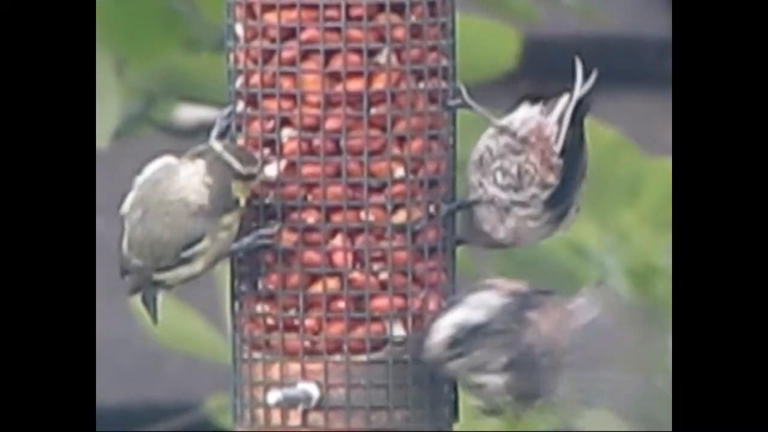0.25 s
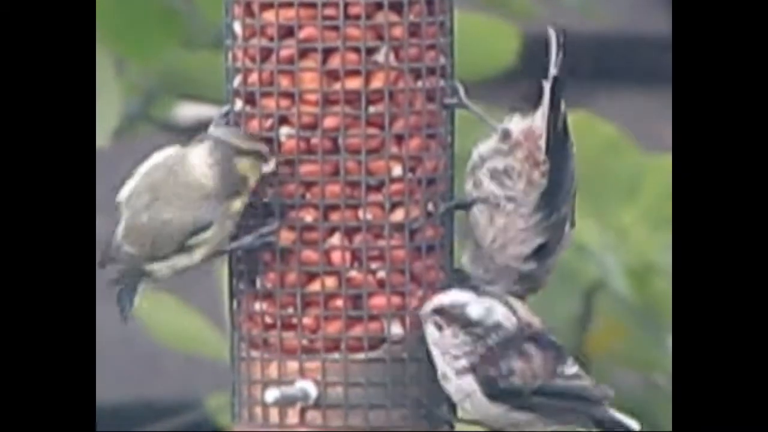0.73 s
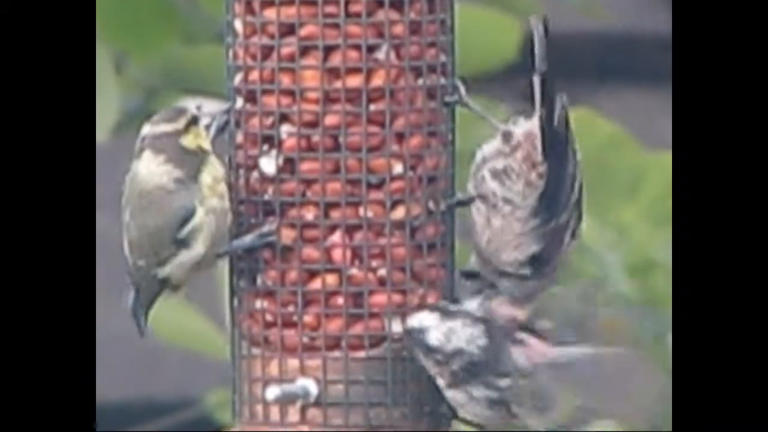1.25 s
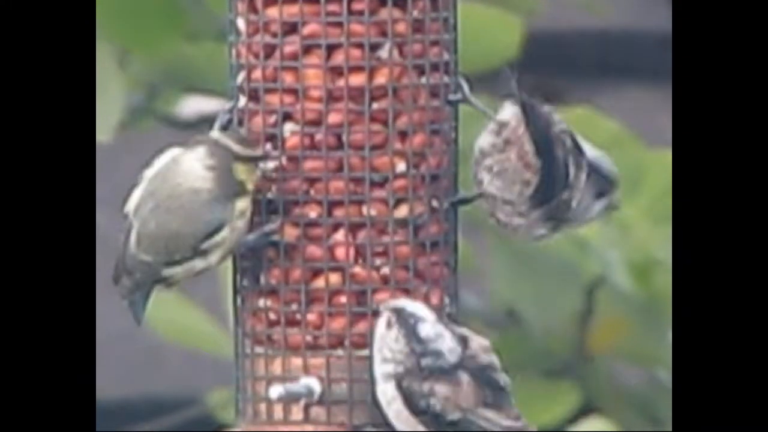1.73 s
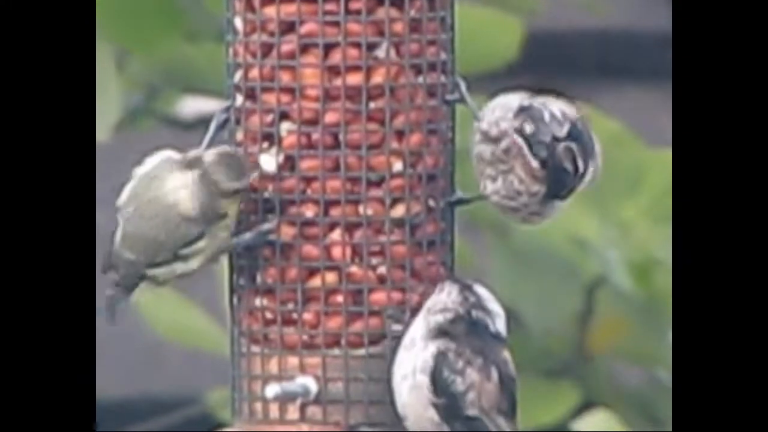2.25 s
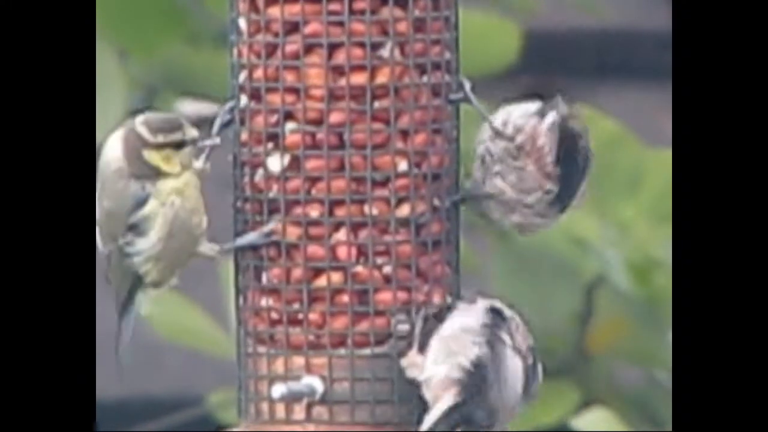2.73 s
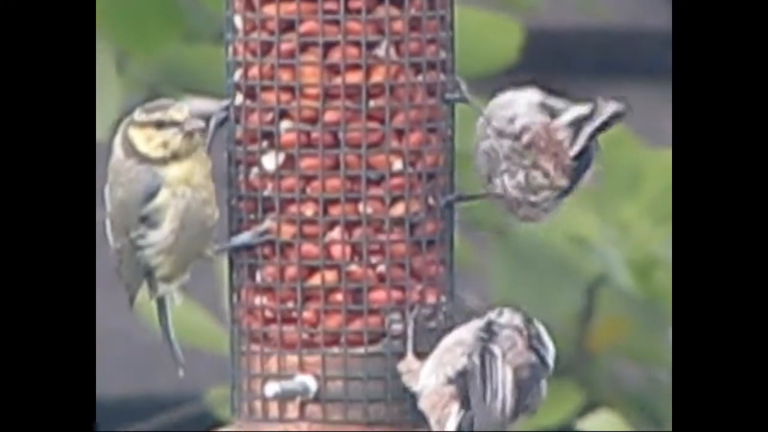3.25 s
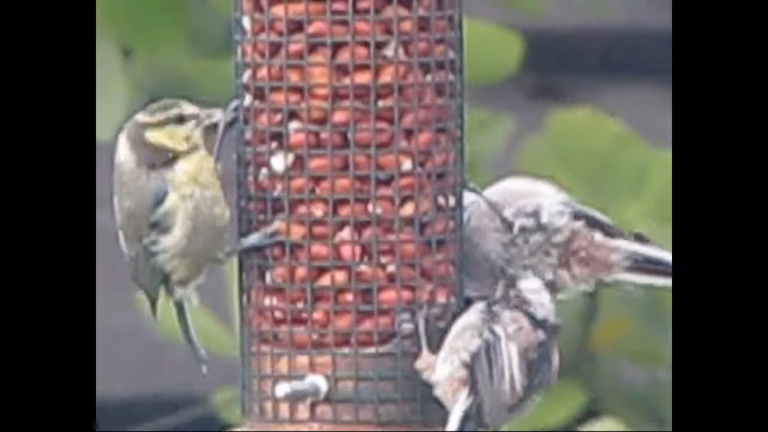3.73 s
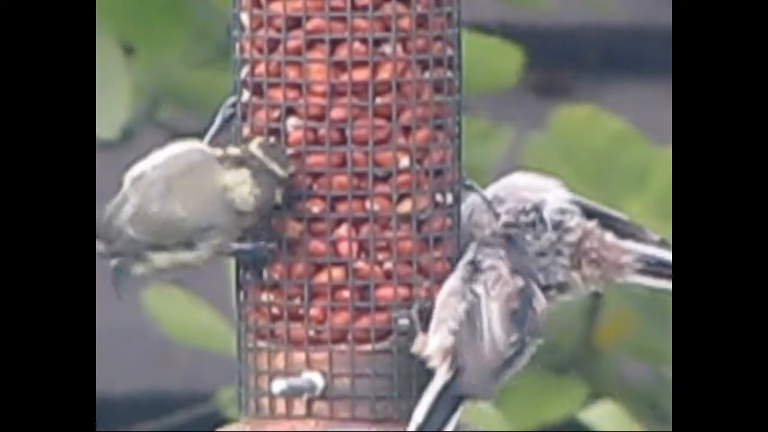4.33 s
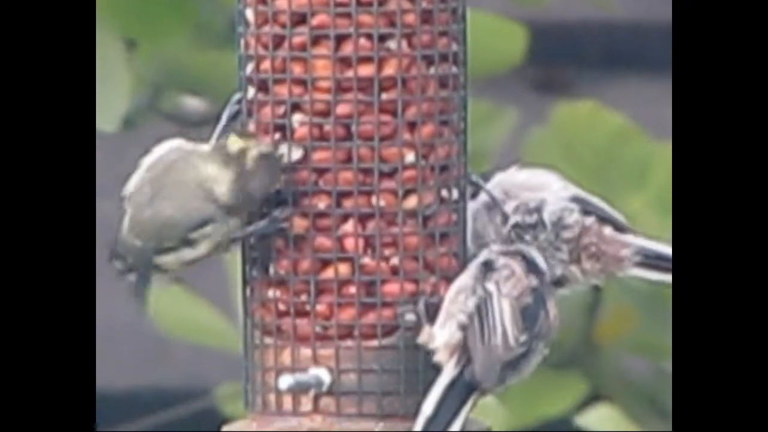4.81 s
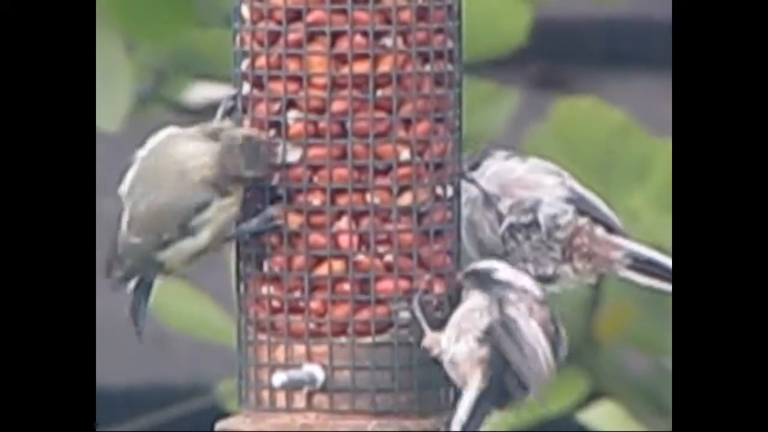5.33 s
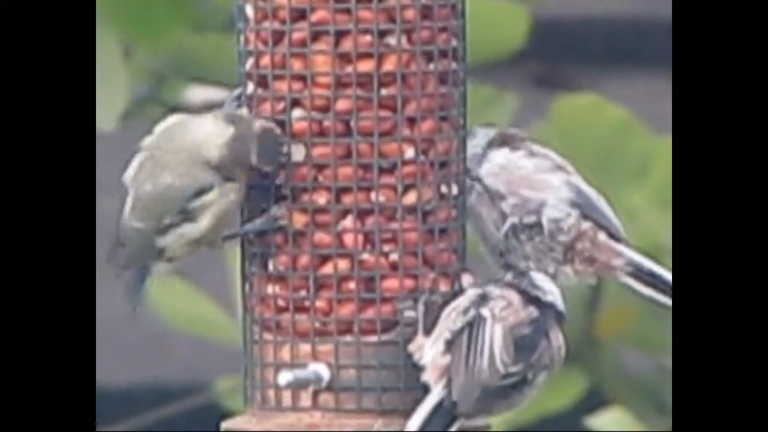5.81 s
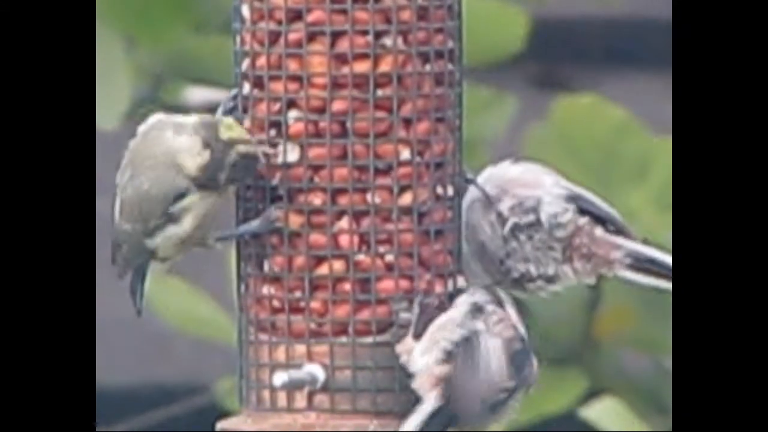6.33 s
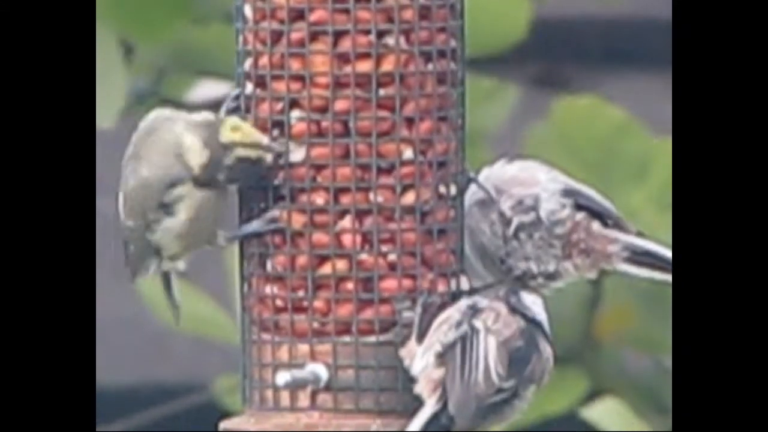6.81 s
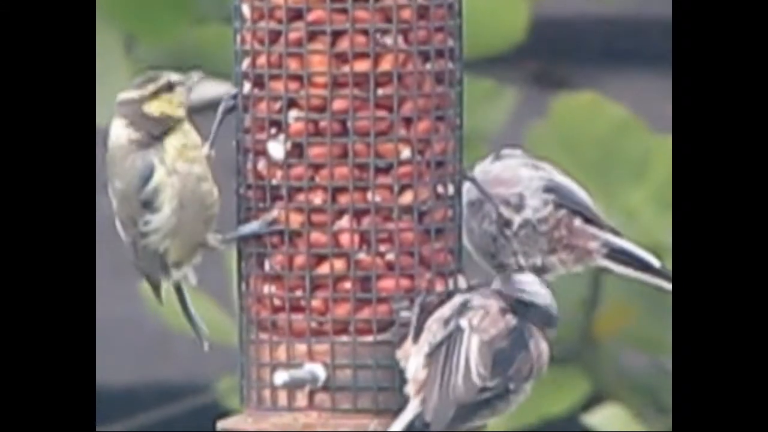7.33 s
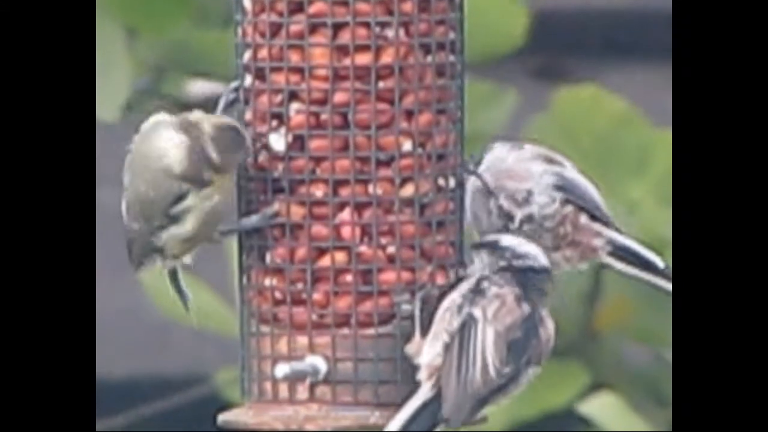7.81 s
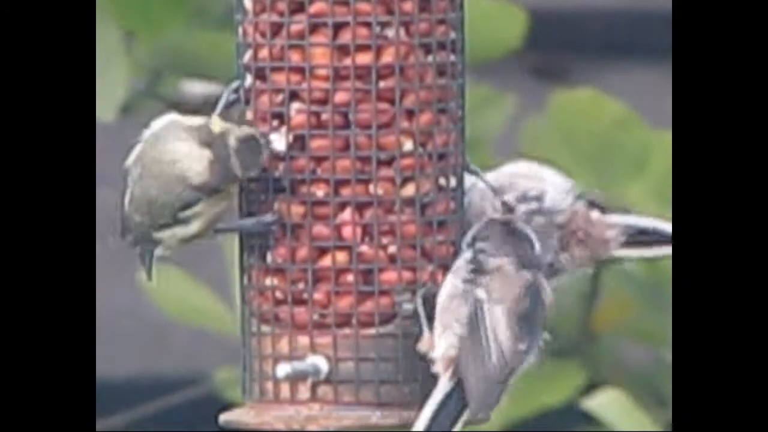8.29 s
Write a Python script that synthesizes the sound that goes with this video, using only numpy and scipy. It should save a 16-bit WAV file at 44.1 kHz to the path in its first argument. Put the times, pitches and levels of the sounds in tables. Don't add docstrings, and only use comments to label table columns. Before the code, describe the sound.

At a garden feeder, tiny birds chip, churr and warble in quick high notes while wings flutter above a faint hum and distant traffic.

```python
import sys
import numpy as np
from scipy import signal
from scipy.fft import rfft, irfft
from scipy.io import wavfile
from scipy.ndimage import uniform_filter1d, map_coordinates

SR = 44100
rng = np.random.default_rng(int(sys.argv[2]) if len(sys.argv) > 2 else 0)


def linear_from_db(decibels):
    return 10 ** (np.asarray(decibels, float) / 20)


def dump(signal):
    limited = np.clip(np.atleast_2d(signal).T, -1, 1)
    pcm = np.round(limited * 32767).astype(np.int16)
    wavfile.write(sys.argv[1], SR, pcm)


N = 377496


def unit(x):
    return x / np.sqrt(np.mean(x ** 2) + 1e-20)


def along(points, hz):
    f, v = np.transpose(points)
    return np.interp(np.log(hz + 1), np.log(f + 1), v)


def wobble(rate_hz, size=N):
    knots = rng.standard_normal(int(size * 2000 / SR) + 4)
    return map_coordinates(knots, [np.arange(size) * rate_hz / SR])


def add(out, start_s, x):
    part = out[max(round(start_s * SR), 0):][:len(x)]
    part += x[:len(part)]


# frequency in Hz, correlation (0 to 1).
STEREO_LIKENESS = [(60, 1), (130, 0.98), (290, 0.96), (630, 0.92), (1370, 0.76), (3010, 0.47), (6580, 0.46),
                   (14400, 0.6)]
# frequency in Hz, left minus right in dB.
STEREO_LEAN = [(60, -0.5), (240, -1), (930, -1.0), (3660, -0.5), (14400, 1)]


def rush(spectrum):
    hz = np.fft.rfftfreq(N, 1 / SR)
    turn = np.arccos(np.clip(along(STEREO_LIKENESS, hz), -1, 1)) / 2
    shaped = rfft(rng.standard_normal((2, N))) * linear_from_db(along(spectrum, hz))
    mid, side = irfft(shaped * [np.cos(turn), np.sin(turn)], N)
    lean = linear_from_db(np.outer([.5, -.5], along(STEREO_LEAN, hz)))
    return unit(irfft(rfft([mid + side, mid - side]) * lean, N))


# frequency in Hz, level in dB.
HUM_TONES = [(120.3, -50), (165.6, -57), (222.5, -59)]


def machine_hum():
    t = np.arange(N) / SR
    hum = 0
    for (hz, db), unsteady in zip(HUM_TONES, (.9, 2.6, 2.2)):
        level = linear_from_db(db + 3.0 + unsteady * wobble(5.4))
        hum = hum + level * np.sin(2 * np.pi * hz * t + unsteady * 0.23 * wobble(5))
    return hum


# frequency in Hz, level in dB per Hz.
TRAFFIC_SPECTRUM = [(12, -47), (20, -12.5), (54, 3.5), (91, -5.5), (102, -23), (124, -1.5), (140, -7),
                    (174, 0), (193, -18), (217, -1), (276, -44), (351, -49), (420, -13), (550, -16),
                    (920, -120)]


def traffic():
    return linear_from_db(-53 + 0.86 * wobble(4.04)) * rush(TRAFFIC_SPECTRUM)


# frequency in Hz, level in dB per Hz.
VEHICLE_SPECTRUM = [(210, -35), (350, -10), (525, -13.5), (908, -6.5), (1170, -10.5), (1260, -8.5),
                    (2120, -17.5), (3500, -24.5), (4550, -75), (7700, -120)]


def vehicle():
    near_db, leaves_s = 9.5, 1.64
    t = np.arange(N) / SR
    return linear_from_db(-62 + near_db * np.exp(-t / leaves_s)) * rush(VEHICLE_SPECTRUM)


# frequency in Hz, level in dB per Hz.
HISS_SPECTRUM = [(180, -3), (300, -3), (482, -15.5), (690, -10), (826, -17), (941, -18.5), (1240, -15),
                 (1350, -19), (5490, -23.5), (6150, -24), (10400, -30.5), (13200, -35), (14800, -63)]


def hiss():
    return linear_from_db(-55 + 0.21 * wobble(2.15)) * rush(HISS_SPECTRUM)


def echo(x, t60s, delay_s, unlike):
    step, lap = SR // 4, SR // 50
    out = np.zeros((2, N + SR))
    ramp = np.sin(np.pi / 2 * np.arange(lap) / lap) ** 2
    fade = np.concatenate([ramp, np.ones(step - lap), 1 - ramp])
    padded = np.pad(x, (lap, step))
    for start in range(0, N + lap, step):
        hz, t, z = signal.stft(rng.standard_normal((2, SR // 3)), SR, nperseg=128)
        decay = linear_from_db(-60 * t / along(t60s, hz)[:, None])
        mid, side = signal.istft(z * decay, SR, nperseg=128)[1]
        tail = np.array([mid + unlike * side, mid - unlike * side]) / np.linalg.norm(mid)
        piece = padded[start:start + step + lap]
        wet = signal.fftconvolve((piece * fade[:len(piece)])[None], tail, axes=1)
        out[:, start + round(delay_s * SR):][:, :wet.shape[1]] += wet
    return out[:, lap:N + lap]


# frequency in Hz, t60 in seconds.
WALL_T60 = [(1500, 0.26), (4000, 0.27), (8000, 0.39), (12000, 0.59)]


def walls(x):
    return echo(x, WALL_T60, delay_s=0.014, unlike=0.028)


# frequency in Hz, t60 in seconds.
LEAF_T60 = [(1500, 0.023), (4000, 0.042), (8000, 0.078), (12000, 0.11)]


def leaves(x):
    return echo(x, LEAF_T60, delay_s=0.0025, unlike=0.013)


# delay in seconds, level in dB.
FENCE_SLAPS = [(.0043, -12.5), (.0092, -29)]


def fence(x):
    return sum(linear_from_db(db) * np.pad(x, (round(delay_s * SR), 0))[:N] for delay_s, db in FENCE_SLAPS)


# frequency in Hz, gain in dB.
THROAT_GAIN = [(1050, -16), (1500, 9.5), (2000, -13.5), (4000, -1.5), (7500, -6.5), (9000, -8.5),
               (14000, -14), (17000, -25)]


def voice(hz, db, partials, edge_s, flutter_db):
    t = np.arange(len(hz)) / SR
    swell = np.sin(np.pi / 2 * np.clip(np.minimum(t, t[-1] - t) / edge_s, 0, 1))
    phase = 2 * np.pi * (np.cumsum(hz) / SR + rng.random())
    tone = sum(linear_from_db(level + along(THROAT_GAIN, k * hz)) * np.sin(k * phase) for k, level in partials)
    return linear_from_db(db + flutter_db * wobble(309.0, size=len(hz))) * swell * tone


def bend(length_s, *hz):
    path = np.interp(np.linspace(0, 1, round(length_s * SR)), np.linspace(0, 1, len(hz)), hz)
    return uniform_filter1d(path, size=31, mode="nearest")


def whistled(hz, db, flutter_db, first_db=-40, edge_s=0.0021):
    third_db = -21 + 0.019 * np.clip(hz - 7300, -1500, 0)
    upper_db = -44 + .007 * np.clip(5800 - hz, 0, 2500)
    partials = [(1.003, 0), (.5, first_db), (5.3, upper_db), (1.502, third_db)]
    return voice(hz, db, partials, edge_s, flutter_db)


def low(hz, db, octave_db, push=3.6, bright=0.):
    gain_db = push * np.clip(3200 - hz, 0, 1800) / 1000 + bright * (hz - 4500) / 1000
    return voice(hz, db + gain_db, [(1, 0.18), (2, octave_db)], edge_s=0.0016, flutter_db=3.0)


def noise_cloud(db):
    t = np.linspace(-1, 1, SR // 40)
    band = signal.butter(4, [1700, 7000], "band", fs=SR, output="sos")
    air = signal.sosfilt(band, rng.standard_normal(len(t)))
    return linear_from_db(db) * unit(air) * np.exp(-(t / 0.49) ** 2)


# first beat in seconds, gap in seconds, beat count, first level in dB, last level in dB.
WING_BURSTS = [(0.149, .0334, 3, -59, -54), (0.349, .0235, 4, -56, -55), (0.5536, .035, 1, -61, -58),
               (4.235, .0355, 5, -50, -68), (4.41, .0348, 5, -66, -60), (4.584, .0367, 3, -57, -53.5),
               (4.698, .0344, 2, -58, -61), (4.8715, .035, 1, -63, -56), (5.012, .029, 3, -62, -57.5),
               (5.142, .0345, 3, -59, -57), (5.248, .04, 2, -59, -54), (5.6046, .0388, 2, -49.5, -49),
               (6.4634, .035, 1, -60, -54), (6.838, .035, 1, -67, -57), (7.059, .0298, 2, -49, -47),
               (7.339, .0356, 2, -49, -52), (7.5446, .035, 1, -55, -54), (8.2845, .035, 1, -60, -58)]


def wings():
    rustle_db, rustle_rise_s = -9, .0022
    out, t = np.zeros(N), np.arange(SR // 30) / SR
    bands = [signal.butter(2, [0.77 * hz, 1.3 * hz], "band", fs=SR, output="sos")
             for hz in (1980, 2780, 3600, 4800, 6400)]
    for first_s, gap_s, count, first_db, last_db in WING_BURSTS:
        for i, db in enumerate(np.linspace(first_db, last_db, round(count))):
            clap_hz = 1800 * (1 + rng.normal(0, 0.03))
            beat = np.sin(2 * np.pi * clap_hz * t) * np.exp(-((t - .003) / 0.0013) ** 2)
            for k, band in enumerate(bands):
                rustle = unit(signal.sosfilt(band, rng.standard_normal(len(t))))
                swell = np.exp(-((t - .0045 - rustle_rise_s * k) / 0.0032) ** 2)
                beat = beat + linear_from_db(rustle_db - 3.3 * k) * rustle * swell
            add(out, first_s + i * gap_s - .001, linear_from_db(db + 8.5) * beat)
    return out


# start in seconds, length in seconds, start pitch in Hz, end pitch in Hz, level in dB.
FAR_BIRDS = [
    (0.11, 0.027, 7450, 6050, -53),
    (3.725, .1, 6640, 6040, -70.5),
    (3.85, 0.059, 6000, 5300, -72),
    (4.63, 0.083, 7500, 7000, -67.5),
    (4.895, 0.14, 7700, 6700, -74),
    (7.45, 0.073, 6250, 6250, -69),
]
DISTANT_PIPER = [
    (5.71, 0.36, 5620, 5550, -75),
]
LEVEL_WHISTLES = [
    (0.817, 0.037, 8055, 7925, -39),
    (2.71, 0.032, 7750, 7850, -47.5),
]
THIN_WHISTLES = [
    (1.08, 0.075, 8260, 8280, -44),
    (1.24, 0.078, 8300, 8180, -45),
    (1.415, 0.08, 8320, 8040, -46),
    (1.57, 0.099, 8420, 7710, -46.5),
    (1.73, .118, 8420, 7770, -45),
    (1.912, .116, 8420, 7540, -43),
    (2.08, 0.11, 8260, 7760, -42.5),
    (2.276, 0.097, 8200, 7740, -43.5),
]


def whistles(calls, lead_hz, waver_hz, period_s, droop_hz, fade_db, flutter_db):
    out = np.zeros(N)
    for start_s, length_s, start_hz, end_hz, db in calls:
        t = np.arange(round(length_s * SR)) / SR
        glide = start_hz + (end_hz - start_hz) * (t / length_s) ** 2
        lead = lead_hz * np.exp(-(t / .0105) ** 2)
        waver = waver_hz * np.cos(2 * np.pi * t / period_s)
        droop = droop_hz * np.exp((t - length_s) / 0.0071)
        breath_db = -6 * np.exp(-t / 0.013) - fade_db * np.exp((t - length_s) / 0.0076)
        add(out, start_s, whistled(glide + lead + waver - droop, db + breath_db + 17.5, flutter_db))
    return out


# start in seconds, length in seconds, floor in Hz, rim above it in Hz, level in dB.
SCOOP_NOTES = [(0.059, 0.052, 7900, 1280, -33), (0.205, 0.041, 7790, 1870, -32),
               (0.325, 0.046, 7990, 1870, -29), (5.08, 0.03, 7880, 1460, -38),
               (5.361, 0.019, 8080, 1750, -32), (5.576, 0.025, 7700, 1050, -53),
               (7.639, .038, 7960, 1450, -40.5), (7.748, .035, 8200, 1770, -33.5),
               (7.97, .04, 8250, 1820, -36), (8.095, 0.03, 8460, 1400, -35.5),
               (8.515, 0.053, 8040, 450, -35)]


def scoops():
    out = np.zeros(N)
    for start_s, length_s, floor_hz, rim_hz, db in SCOOP_NOTES:
        hz = floor_hz + rim_hz * bend(length_s, 0.96, 0.14, 0, 0.021, .45, 1.13)
        add(out, start_s, whistled(hz, db - 4.7 * (hz - floor_hz) / 1000, 4.2))
    return out


# start in seconds, length in seconds, top pitch in Hz, period in seconds, level in dB.
SLIDING_WARBLES = [
    (5.452, 0.039, 8220, 0.017, -30),
    (5.646, 0.052, 8240, 0.019, -27),
    (5.654, 0.046, 7400, .026, -40),
    (5.779, 0.073, 8330, 0.017, -24.5),
    (5.981, 0.038, 8420, 0.012, -33.5),
]
ARCHED_WARBLES = [
    (1.975, 0.051, 7600, 0.018, -40.5),
    (5.024, 0.041, 7800, 0.021, -30.5),
    (6.730, 0.04, 8340, 0.021, -31.5),
    (7.521, 0.0345, 7670, 0.015, -29),
    (8.196, 0.043, 8000, 0.024, -31),
]
OPEN_WARBLE = [
    (2.9615, 0.047, 7500, 0.015, -21),
]


def warbles(calls, depth, skew, sag_hz, flutter_db):
    out = np.zeros(N)
    for start_s, length_s, top_hz, period_s, db in calls:
        cycle = np.arange(round(length_s * SR)) / SR / period_s + 0.076
        skewed = cycle + skew * np.sin(np.pi * cycle) ** 2
        dips = depth * top_hz * np.abs(np.cos(np.pi * skewed)) ** 3.2
        swell_db = -8 * np.exp(-cycle / 0.7)
        hz = top_hz - sag_hz * cycle - dips
        add(out, start_s, whistled(hz, db + 6.0 + swell_db, flutter_db, first_db=-36.5, edge_s=0.0014))
    return out


# start in seconds, dip in Hz, end in Hz, dip level in dB, stroke level in dB.
NEAR_CHURRS = [
    (.0, 3560, 1400, -31, -26),
    (0.039, 4380, 2040, -50, -26.5),
    (0.687, 4140, 1530, -22, -20.5),
    (0.732, 3600, 1500, -23.5, -20),
    (2.545, 3900, 1550, -31.5, -26),
    (2.584, 2850, 1530, -26.5, -30),
    (2.626, 2610, 1500, -30, -25.5),
    (2.671, 2470, 1510, -39, -26),
]
HIDDEN_CHURRS = [
    (3.091, 4330, 1940, -35, -30),
    (3.135, 3960, 2160, -32, -31),
    (3.178, 3570, 2010, -31.5, -28),
    (3.227, 3700, 1890, -34, -28.5),
]


def churrs(syllables, bright):
    octave_db = -31
    out = np.zeros(N)
    for start_s, dip_hz, end_hz, dip_db, stroke_db in syllables:
        top_hz = 3700 + .7 * dip_hz
        dip = bend(.0085, top_hz, dip_hz, 1.25 * top_hz)
        stroke = bend(0.0068, 1.12 * top_hz, 0.62 * top_hz, end_hz)
        add(out, start_s, low(dip, dip_db + 1.5, octave_db, push=1.5, bright=bright))
        add(out, start_s + 0.0115, low(stroke, stroke_db + 1, octave_db, push=1.8, bright=bright))
        add(out, start_s - .002, noise_cloud(stroke_db - 26.5))
    return out


FOOT_HZ = 1550

# start in seconds, length in seconds, peak in Hz, level in dB.
CHIP_ARCS = [(0.3004, 0.0075, 5000, -27.5), (0.674, 0.0086, 4640, -33.5), (0.736, 0.0047, 4200, -38),
             (1.0557, 0.013, 5460, -36.5), (2.089, 0.012, 4930, -41), (2.46, .013, 5470, -35),
             (2.6123, .011, 5100, -34.5), (3.28, 0.01, 5045, -29), (3.495, 0.014, 5770, -37.5),
             (3.5936, 0.0094, 4370, -35.5), (4.01, 0.013, 3820, -43.5), (5.324, 0.0089, 5605, -32.5),
             (5.464, 0.0075, 5330, -32), (7.813, 0.0073, 5170, -35), (7.912, 0.014, 5420, -43),
             (8.082, 0.005, 2200, -52), (8.098, 0.011, 4260, -34.5), (8.126, 0.0039, 2190, -51),
             (8.337, 0.0077, 3710, -37), (8.496, .014, 4930, -41.5)]


def arc_notes():
    shoulder = .66
    return [(start_s, db, FOOT_HZ + (peak_hz - FOOT_HZ) * bend(length_s, 0, shoulder, 1, shoulder, 0))
            for start_s, length_s, peak_hz, db in CHIP_ARCS]


# start in seconds, length in seconds, top in Hz, level in dB.
DOWN_STROKES = [
    (2.718, 0.0047, 5530, -51),
    (3.289, 0.013, 4110, -46.5),
    (3.296, 0.0085, 4460, -45),
]


def stroke_notes():
    middle = .58
    return [(start_s, db, bend(length_s, top_hz, FOOT_HZ + middle * (top_hz - FOOT_HZ), FOOT_HZ))
            for start_s, length_s, top_hz, db in DOWN_STROKES]


# start in seconds, length in seconds, start pitch in Hz, end pitch in Hz, level in dB.
SLUR_NOTES = [
    (0.043, 0.0065, 1774, 5750, -34.5),
    (0.603, 0.011, 6600, 7740, -27),
    (1.773, 0.014, 4000, 6370, -40),
    (2.467, .014, 6400, 8040, -41),
    (2.513, 0.018, 5830, 5500, -42.5),
    (3.016, .005, 7540, 8000, -23),
    (4.7722, .016, 4150, 6360, -36.5),
    (6.4312, 0.015, 3350, 6520, -34.5),
    (7.3085, 0.024, 5140, 6700, -43),
]


def slur_notes():
    middle = .85
    return [(start_s, db, bend(length_s, start_hz, start_hz + middle * (end_hz - start_hz), end_hz))
            for start_s, length_s, start_hz, end_hz, db in SLUR_NOTES]


# start in seconds, dip in Hz, dip level in dB, settle time in seconds, settle level in dB.
OPENING_FLICKS = [
    (0.617, 5090, -21, 0.013, -26.5),
    (0.648, 5340, -21, .016, -33),
    (2.484, 5620, -31.5, 0.021, -39.5),
    (2.515, 5240, -33, .012, -52),
    (3.022, 5430, -29.5, .022, -30.5),
    (3.054, 5700, -30.5, 0.025, -36),
]


def flick_notes():
    flick_s, from_hz, to_hz = .0084, 7600, 8550
    notes = []
    for start_s, dip_hz, dip_db, settle_s, settle_db in OPENING_FLICKS:
        notes.append((start_s, dip_db, bend(flick_s, from_hz, .9 * from_hz, dip_hz, to_hz)))
        notes.append((start_s + flick_s, settle_db, bend(settle_s, to_hz, 7240, 7260)))
    return notes


def chips():
    whistle_above_hz = 3000
    out = np.zeros(N)
    for start_s, db, hz in arc_notes() + stroke_notes() + slur_notes() + flick_notes():
        if hz.min() > whistle_above_hz:
            add(out, start_s, whistled(hz, db + 5.5, 1.5))
        else:
            add(out, start_s, low(hz, db + 4.5, -20.5, push=7.5))
            add(out, start_s + len(hz) / SR / 2 - 1 / 80, noise_cloud(db - 7.5))
    return out


def scene():
    background = machine_hum() + traffic() + vehicle() + hiss()
    far = whistles(FAR_BIRDS, lead_hz=60, waver_hz=130, period_s=.024, droop_hz=30, fade_db=2, flutter_db=4.0)
    far += whistles(DISTANT_PIPER, lead_hz=5, waver_hz=15, period_s=0.028, droop_hz=15, fade_db=6,
                    flutter_db=3.0)
    high = whistles(THIN_WHISTLES, lead_hz=784, waver_hz=255, period_s=.0225, droop_hz=820, fade_db=13,
                    flutter_db=2.5)
    high += whistles(LEVEL_WHISTLES, lead_hz=300, waver_hz=51, period_s=0.0296, droop_hz=30, fade_db=17,
                     flutter_db=2.5)
    high += scoops()
    hidden = churrs(HIDDEN_CHURRS, bright=3.0)
    clear = warbles(OPEN_WARBLE, depth=0.14, skew=-0.027, sag_hz=37, flutter_db=1.0)
    sharp = wings() + churrs(NEAR_CHURRS, bright=1.7) + chips()
    near = sharp + warbles(SLIDING_WARBLES, depth=.15, skew=0.099, sag_hz=128, flutter_db=1.6)
    near += warbles(ARCHED_WARBLES, depth=.15, skew=.03, sag_hz=60, flutter_db=1.6)

    late = linear_from_db(-21.0) * (near + clear + hidden) + linear_from_db(-18.0) * high + linear_from_db(-14) * far
    scatter = linear_from_db(-2.5) * near + linear_from_db(-4) * high + linear_from_db(-21.0) * far + linear_from_db(-10) * clear + linear_from_db(3.5) * hidden
    direct = near + clear + linear_from_db(-4.0) * high + linear_from_db(-9.5) * far + linear_from_db(-0.5) * hidden
    return background + walls(late) + leaves(scatter) + fence(sharp + hidden) + direct


def low_pass(x):
    return signal.sosfilt(signal.butter(12, 15000, fs=SR, output="sos"), x)


def record(dry):
    return low_pass(dry)


dry = scene()
out = record(dry)
dump(out)
```